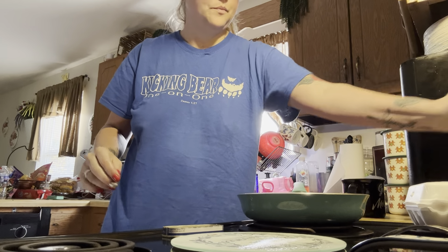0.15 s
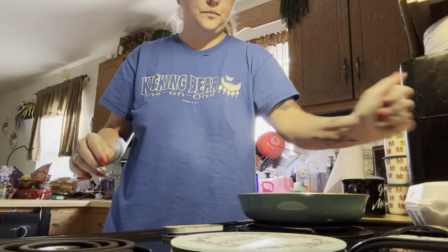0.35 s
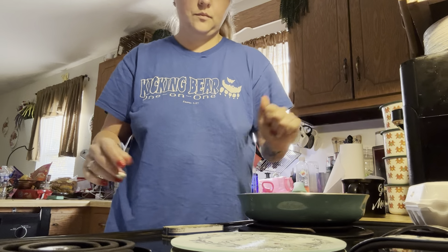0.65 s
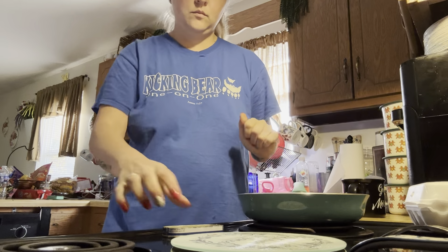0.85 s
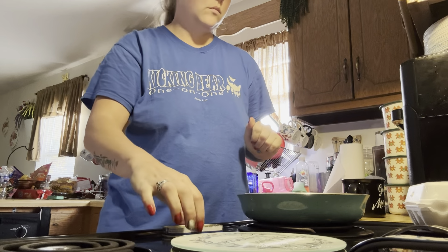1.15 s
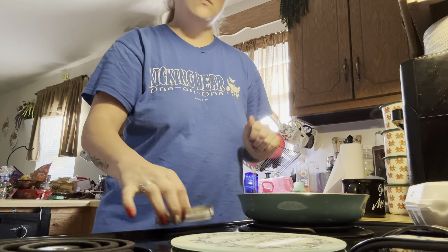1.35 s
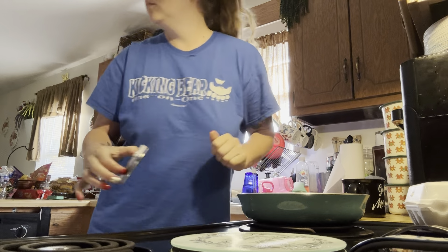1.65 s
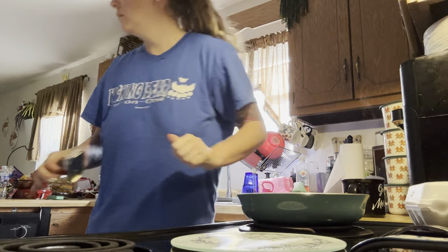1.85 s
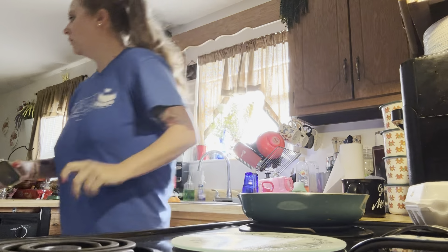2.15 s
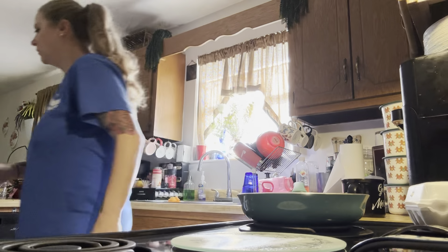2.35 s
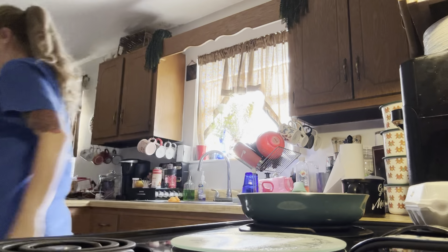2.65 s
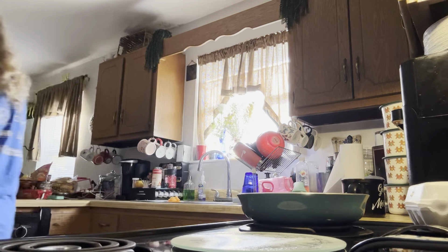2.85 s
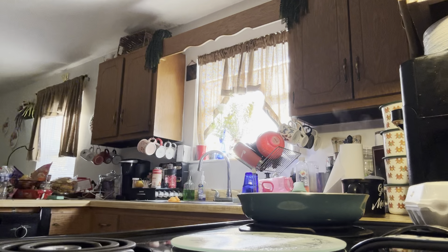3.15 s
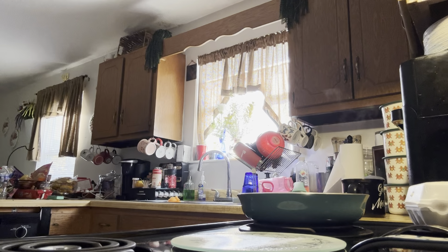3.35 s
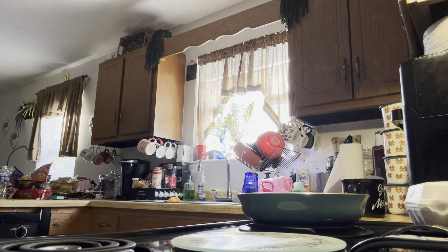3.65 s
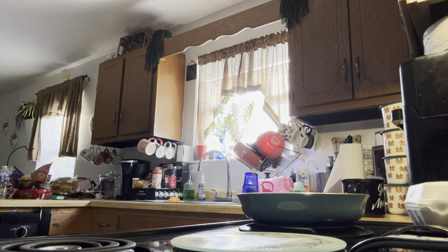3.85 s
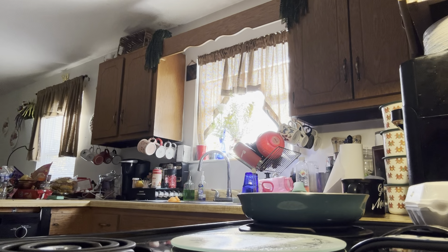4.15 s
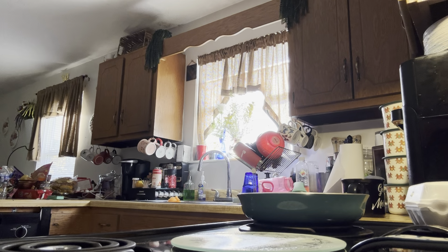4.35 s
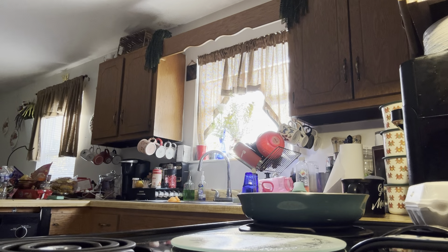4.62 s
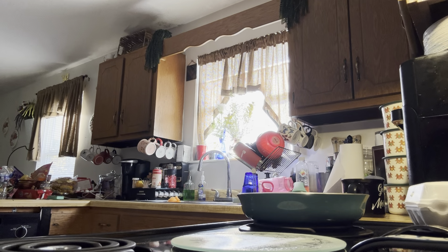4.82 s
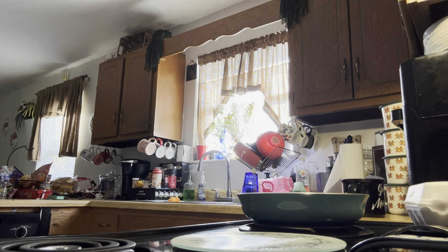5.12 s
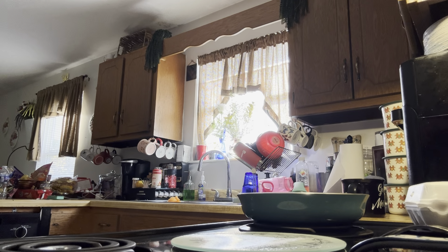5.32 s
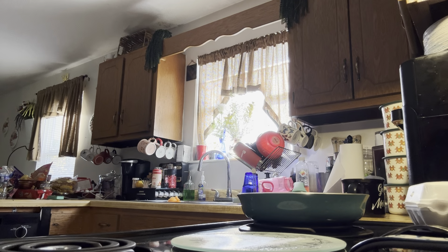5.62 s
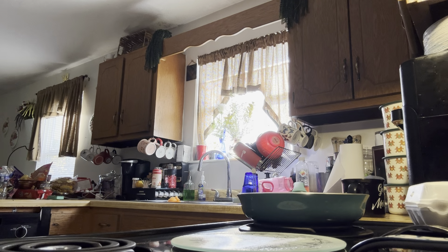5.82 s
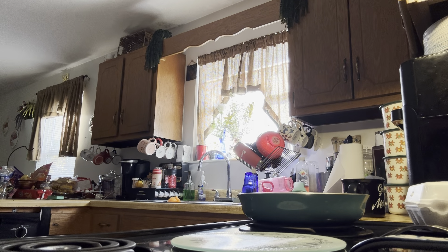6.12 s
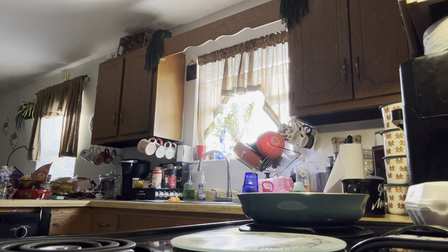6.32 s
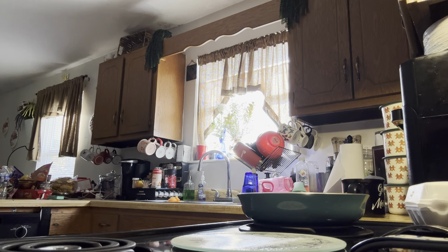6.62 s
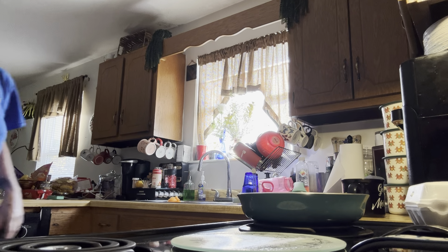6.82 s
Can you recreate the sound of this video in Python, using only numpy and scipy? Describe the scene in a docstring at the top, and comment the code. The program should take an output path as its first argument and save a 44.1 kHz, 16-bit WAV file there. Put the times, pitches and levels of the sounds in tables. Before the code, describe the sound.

A sharp lid snap right beside the microphone, soft shuffling steps over a wooden floor, then distant cupboard knocks, a rattling slam and a drawer starting to roll.

```python
"""Jar lid and steps in a quiet kitchen

A home kitchen heard by a phone on the stove. Close by, a jar lid is slid and snapped up: rough noise and short modes.
Slippered steps cross a wooden floor as brushing noise and low beating thuds. Further away cabinet doors knock broad
wooden resonances, tinware rattles as many thin modes and a drawer starts to roll, over still air and a low rumble.
"""
import sys
import numpy as np
from scipy import signal
from scipy.fft import rfft, irfft, next_fast_len
from scipy.io import wavfile
from scipy.ndimage import uniform_filter1d

SR = 44100
rng = np.random.default_rng(int(sys.argv[2]) if len(sys.argv) > 2 else 0)


def put_to_file(sound):
    """Save the sound as 16-bit audio at rate SR, in the file named by the first command-line argument."""
    columns = np.atleast_2d(sound).T  # one column per channel
    safe = np.clip(columns, -1, 1)
    whole_steps = np.round(safe * 32767)
    wavfile.write(sys.argv[1], SR, whole_steps.astype(np.int16))


N = 307664
T = np.arange(N) / SR  # seconds

WANDER_DB = 1.3  # slow unevenness of blows and rings


def undb(db):
    """Decibels to gain."""
    return np.exp(np.asarray(db) * (np.log(10) / 20))


def level(x, db):
    """Scale to an rms level in dB."""
    return x * undb(db) / np.sqrt(np.mean(x ** 2))


def colour(x, points):
    """Shape the spectrum by (Hz, dB) points joined on a log frequency axis."""
    hz, db = np.transpose(points)
    n = next_fast_len(x.shape[-1])
    f = np.maximum(np.arange(n // 2 + 1) * SR / n, 1)
    gain = undb(np.interp(np.log(f), np.log(hz), db))
    return irfft(rfft(x, n) * gain, n)[..., :x.shape[-1]]


def band(x, lo_hz, hi_hz):
    """Band-pass."""
    return signal.sosfilt(signal.butter(2, [lo_hz, hi_hz], "band", fs=SR, output="sos"), x)


def mode(x, hz, t60):
    """One ringing mode, a two-pole resonator; a unit impulse rings with unit size."""
    r, w = np.exp(-np.log(1000) / (t60 * SR)), 2 * np.pi * hz / SR
    return signal.lfilter([0, r * np.sin(w)], [1, -2 * r * np.cos(w), r * r], x)


def curve(table):
    """A (seconds, dB) curve over time, silent outside it."""
    s, db = np.transpose(table)
    return np.interp(T, s, db, -200, -200)


def swell(s, rise, t60):
    """Envelope that rises smoothly from s on and dies away, top 1."""
    envelope, i = np.zeros(N), int(s * SR)
    t = T[:min(N - i, int(2 * (rise + t60) * SR) + 9)]
    attack = (1 - np.exp(-t / max(rise, 0.0002))) ** 2
    envelope[i:i + len(t)] = attack * np.exp(-np.log(1000) * t / max(t60, 0.004))
    return envelope / envelope.max()


def walk(rate, size=N):
    """Slow chance with about `rate` fresh values a second, smoothed, spread near 1."""
    k = int(SR / rate)
    steps = np.repeat(rng.standard_normal(size // k + 1), k)
    return 1.3 * uniform_filter1d(uniform_filter1d(steps, k), k)[:size]


def grit(spread_db):
    """Mid and side noise with uneven grain sizes in common, rms 1."""
    grain_db = spread_db * np.minimum(rng.exponential(size=N), 4)
    return level(rng.standard_normal((2, N)) * undb(grain_db), 0)


def favour(hz, favoured_hz, lift_db, octaves):
    """Lift in dB of a mode that lies near the pitch a blow favours."""
    return lift_db * np.exp(-(np.log2(hz / favoured_hz) / octaves) ** 2)


def patchy(x, edges_hz):
    """Overlapping bands, each flickering on its own, rms 1."""
    return level(sum(band(x, lo, hi) * undb(1.1 * walk(30)) for lo, hi in zip(edges_hz, edges_hz[2:])), 0)


def background():
    """Still room air and the low rumble of house and fridge, both shaped noise."""
    # Colour of the still air. Each row: frequency in Hz, relative level in dB per Hz.
    air_colour = [(88, -34), (150, -4), (222, -11.5), (361, -6), (431, -10.5), (555, -14), (1870, -27),
                  (2550, -25), (2870, -29.5), (4860, -31), (16000, -36)]
    # Colour of the rumble. Each row: frequency in Hz, relative level in dB per Hz.
    rumble_colour = [(12, -55.5), (20, -26), (43, -10.5), (59, 0), (76, -7.5), (107, 0), (128, -2.5),
                     (150, -15.5), (178, -14), (200, -18.5), (260, -34), (440, -120)]
    # The floor trembling under shifting weight. Each row: time in seconds, level in dB.
    tremble = [(0.0, -63.5), (0.56, -61), (0.85, -66), (1.42, -56), (1.92, -64), (2.23, -58), (3.01, -60),
               (3.3, -56.5), (3.71, -55), (3.95, -61), (4.99, -49), (5.3, -53), (5.7, -52), (6.3, -54),
               (6.98, -51.5)]
    air = level(colour(rng.standard_normal((2, N)), air_colour), -75)
    rumble = level(colour(rng.standard_normal((2, N)), rumble_colour), 0)
    return air * undb(0.74 * walk(4.2)) + rumble * undb(curve(tremble))


def scuffs():
    """Soft brushing in a high and a middle band; each stroke swells and fades."""
    # Soles and cloth brushing. Each row: start in seconds, swell in seconds, fade in seconds,
    # level in dB, middle band in dB relative to that level.
    brushes = [(0.019, 0.015, 0.15, -87, 8.5), (0.39, 0.027, 0.095, -94, 7), (0.6, 0.081, 0.097, -82.5, -5),
               (0.72, 0.028, 0.2, -81.5, -14), (0.87, 0.043, 0.38, -92, 5), (1.92, 0.02, 0.12, -88, 8.5),
               (2.012, 0.022, 0.29, -76, -3.5), (2.23, 0.041, 0.11, -79.5, -25),
               (2.399, 0.035, 0.13, -79.5, -5), (2.49, 0.045, 0.12, -72.5, 5.5),
               (2.668, 0.048, 0.34, -70.5, -0.5), (2.9, 0.053, 0.13, -86, -2.5),
               (3.101, 0.027, 0.082, -78, -9), (3.421, 0.12, 0.22, -71, 3), (3.71, 0.025, 0.096, -73.5, -4),
               (3.955, 0.029, 0.79, -83, -12), (4.24, 0.08, 0.25, -72, -3.5), (4.528, 0.03, 0.41, -76, 2.5),
               (5.822, 0.0097, 0.086, -83, 14), (6.024, 0.014, 0.11, -73, 0),
               (6.109, 0.079, 0.17, -73, -0.5), (6.299, 0.023, 0.11, -79, -8),
               (6.425, 0.013, 0.23, -70.5, -2.5), (6.6, 0.019, 0.27, -76.5, 3),
               (6.85, 0.013, 0.065, -82, -3)]
    # Colour of the high band. Each row: frequency in Hz, relative level in dB per Hz.
    high_colour = [(1760, -23), (3000, -6), (5840, -1), (9620, 1), (12700, -13), (13700, -23), (15000, -18)]
    grain_db = 3.5  # unevenness of the brushing
    hold = 0.7  # under 1 squares the shoulders of swell and fade
    high = patchy(colour(grit(grain_db), high_colour),
                  [1000, 1800, 2800, 4200, 6000, 8300, 11500, 16000, 20000])
    high = high * undb(1.5 * walk(31))
    middle = patchy(grit(grain_db), [604, 890, 1450, 2235, 3130, 4434]) * undb(1.1 * walk(39))
    ramps = [np.interp(T, [s, s + up, s + up + down], [0, 1, 0]) for s, up, down, *_ in brushes]
    stroke = np.sin(np.pi / 2 * np.array(ramps)) ** (2 * hold)
    *_, db, middle_db = np.transpose(brushes)
    return high * (undb(db) @ stroke) + middle * (undb(db + middle_db) @ stroke)


def thuds():
    """Joists and panels take up the weight slowly and beat against each other."""
    # Weight landing on floor and carcass. Each row: start in seconds, joists in dB, panels in dB, t60 in seconds.
    landings = [(2.028, -50.5, -69.5, 0.27), (2.133, -46.5, -52, 0.43), (2.685, -36, -48.5, 0.32),
                (2.748, -42, -52, 0.31), (3.176, -39.5, -42, .15), (3.197, -37, -41, 0.33),
                (3.231, -34.5, -51.5, 0.12), (3.289, -35, -36.5, 0.346), (3.43, -44, -66, 0.15),
                (4.139, -45, -43, 0.4), (4.168, -47, -38, 0.19), (4.268, -53, -45.5, 0.089),
                (4.467, -42, -38.5, 0.33), (4.753, -38, -26, 0.25), (4.837, -39, -32, 0.18),
                (5.071, -41.5, -30.5, 0.18), (5.095, -45, -33.5, 0.2), (5.453, -50.5, -40, 0.27),
                (5.606, -55, -33, 0.27), (5.837, -66, -45.5, 0.13), (6.03, -46.5, -50, 0.13),
                (6.063, -42, -46, 0.408), (6.168, -44.5, -60.5, 0.16), (6.498, -46, -44, 0.23),
                (6.529, -47, -43.5, 0.45), (6.602, -36, -57.5, 0.22), (6.639, -40, -59, 0.21),
                (6.821, -48.5, -35, 0.39), (6.854, -67.5, -29.5, 0.36), (6.937, -42, -28, 0.46)]
    # Low modes of the floor joists. Each row: nominal frequency in Hz, relative level in dB.
    joists = [(28, -9.5), (38, -3), (49, 1.5), (62, 3.5), (74, 5.5)]
    # Modes of the panels. Each row: nominal frequency in Hz, relative level in dB.
    panels = [(104, -5.5), (118, 5.5), (128, 0), (184, -5.5), (235, -14)]
    deep_share = 0.23  # the more a thud goes into the joists, the more it wakes the deepest ones
    out = np.zeros(N)
    chances = rng.standard_normal((len(landings), len(joists + panels), 2))
    for (s, joist_db, panel_db, t60), chance in zip(landings, chances):
        deep_db = deep_share * (joist_db - panel_db)
        tones = [(f, db + joist_db + deep_db * (f < 55)) for f, db in joists]
        tones += [(f, db + panel_db) for f, db in panels]
        now = slice(int(s * SR), int((s + 1) * SR))
        ring = 0
        for (f, db), (detune, turn) in zip(tones, chance):
            angle = 2 * np.pi * f * (1 + 0.036 * detune) * (T[now] - s) + 0.62 * turn
            ring = ring + undb(db - 5.5) * np.sin(angle)
        out[now] += swell(s, 0.012, t60)[now] * ring
    return out


def wood(drive):
    """Broad resonances of doors and boards, each pushed by drive(Hz)."""
    # Wooden resonances. Each row: frequency in Hz, width in Hz, relative level in dB.
    boards = [(201.7, 21.5, 5.5), (255.3, 64, 4.5), (360, 44.3, 6.5), (405, 81, 2.5), (493, 67, 9.5),
              (525, 147, 5.5), (566, 35, 1.5), (729, 84, 3), (781.4, 64, 1.5), (851, 56, 1.5),
              (1025, 190, 1.5), (954, 69, -0.5), (1077, 88, -3.5), (1332, 230, 1), (1473, 72, -1.5),
              (1950, 460, -2.5)]
    return sum((-1) ** k * undb(db - 49.0) * np.sqrt(width) * mode(drive(f), f, 1.98 / width)
               for k, (f, width, db) in enumerate(boards))


def drawer():
    """Rollers bump along their runners and shake the wooden box."""
    # The drawer rolling. Each row: time in seconds, level in dB.
    roll = [(6.79, -69), (6.815, -51), (6.85, -47), (6.93, -47), (6.98, -44.5)]
    out, start = np.zeros((2, N)), int(roll[0][0] * SR) - SR // 2
    bumps = grit(2.7)[:, start:]
    out[:, start:] = level(band(wood(lambda f: bumps), 285, 780), 0)
    return undb(curve(roll) + 1.1 * walk(60)) * out


def tinware():
    """Bursts of small collisions ring thin metal over their own clatter; each burst favours other modes."""
    # Tinware jolted when the door slams, and settling. Each row: start in seconds, level in dB,
    # brightness in dB relative to that level, favoured pitch in Hz, t60 in seconds.
    jostle = [(5.041, -44.5, -5, 4500, 0.28), (5.064, -30, -5.5, 3900, 0.4), (5.096, -32.5, -2, 3370, 0.37),
              (5.13, -33.5, 2, 1480, 0.18), (5.162, -37, -8, 2520, 0.099), (5.185, -43.5, -14, 832, .12),
              (5.198, -41.5, -6, 2520, 0.19), (5.234, -42, -19, 960, 0.13),
              (5.284, -41.5, -4.5, 837, 0.025), (5.291, -33, 0.5, 2840, 0.053),
              (5.299, -34.5, 1, 2450, 0.06), (5.309, -31.5, -15.5, 955, 0.089),
              (5.325, -39.5, -16, 2520, 0.06), (5.35, -49, -3, 880, 0.037), (5.384, -49.5, -4, 940, 0.13)]
    # Modes of the tin. Each row: frequency in Hz, relative level in dB, t60 in seconds.
    tin = [(826, -9, 0.2), (857, -16, 0.056), (960, -3, 0.15), (1020, -17, 0.13), (1250, -11, 0.2),
           (1465, -1.5, 0.1), (1532, -3.5, 0.049), (1684, -12.5, .1), (1775, -4, 0.16), (1863, -8.5, 0.16),
           (1977, -4, 0.07), (2220, -15, 0.037), (2556, -0.5, 0.064), (2830, -12.5, 0.048),
           (2610, -17, 0.05), (2930, -2, 0.043), (3013, -2, 0.057), (3416, -7.5, 0.062), (3680, -12.5, .07),
           (3920, -5, 0.044), (4570, -11.5, 0.076), (4700, -16, .08)]
    # Colour of the clatter. Each row: frequency in Hz, relative level in dB per Hz.
    clatter_colour = [(120, -46), (400, -32.5), (800, -14.5), (2000, -11.5), (4000, -8), (8000, -17.5),
                      (12000, -24), (16000, -42)]
    out, start = np.zeros((2, N)), int(jostle[0][0] * SR)
    now = slice(start, start + SR)
    bumps = (grit(2.3) * undb(0.9 * walk(60)))[:, now]
    push = np.array([swell(s, 0.0046, t60)[now] for s, *_, t60 in jostle])
    _, db, bright_db, favoured_hz, _ = np.transpose(jostle)
    ring = 0
    for f, mode_db, t60 in tin:
        lift_db = favour(f, favoured_hz, lift_db=14, octaves=0.12)
        blows = undb(db + lift_db + (bright_db if f > 2200 else 0)) @ push  # sharp blows wake the upper modes
        uneven = undb(WANDER_DB * walk(30, size=SR))
        ring = ring + undb(mode_db - 37.0) * mode(bumps * blows * uneven, f, t60)
    clatter = colour(bumps * ((undb(db) + undb(db + bright_db)) @ push), clatter_colour)
    out[:, now] = ring + undb(2.0) * clatter
    return out


def clinks():
    """Faint short tones: noise through a narrow resonance, which roughens them."""
    # Faint narrow tones. Each row: start in seconds, frequency in Hz, level in dB, t60 in seconds.
    tones = [(0.038, 2530, -70, 0.3), (0.038, 1140, -71.5, 0.11), (0.415, 2460, -78.5, 0.089),
             (0.41, 4830, -89, 0.12), (0.62, 5350, -83, .15), (0.739, 6330, -72, 0.3),
             (1.53, 2650, -78.5, 0.11), (1.549, 3263, -74, 0.21), (1.58, 5900, -81, 0.19),
             (1.585, 8010, -85, 0.13), (1.69, 1800, -80.5, 0.19), (1.74, 1100, -76, 0.11),
             (1.94, 1420, -75, 0.36), (1.945, 1890, -74.5, 0.31), (2.02, 1370, -77.5, .12),
             (2.08, 2480, -80, 0.17), (2.525, 955, -73, 0.07), (2.54, 2720, -68, 0.15),
             (2.685, 840, -71, 0.069), (2.94, 2150, -74.5, 0.31), (3.918, 1986, -78, 0.13),
             (4.137, 2360, -57, 0.066), (4.165, 2930, -61, 0.13), (4.178, 3620, -60, 0.066),
             (4.19, 3330, -57.5, 0.12), (4.225, 3530, -70, 0.08), (4.28, 1240, -69.5, 1),
             (5.586, 2320, -55.5, .07), (5.6, 2010, -63, .08), (6.296, 1167, -73.5, 0.068)]
    noise = rng.standard_normal((2, N))
    out = np.zeros((2, N))
    for s, f, db, t60 in tones:
        now = slice(int(s * SR), int(s * SR) + SR // 2)
        narrow = level(mode(noise[:, now], f, 0.02), db) * undb(WANDER_DB * walk(40, size=SR // 2))
        out[:, now] += swell(s, 0.0071, t60)[now] * narrow
    return out


def metal_tap():
    """A small metal thing tapped once: a rough burst of noise wakes a few modes."""
    # Modes of the metal. Each row: frequency in Hz, relative level in dB, t60 in seconds.
    tap_ring = [(2055, 1.5, 0.063), (2230, -5, .03), (2640, 3.5, 0.05), (3300, -8.5, .03)]
    contact = rng.standard_normal((2, N)) * swell(5.827, 0.00089, 0.2) / 12
    return sum(undb(db - 63.5) * mode(contact * undb(3.2 * walk(60)), f, t60) for f, db, t60 in tap_ring)


def squeaks():
    """Faint gliding tones, each a sine sweeping between two pitches with unsteady level and phase."""
    # Squeaks. Each row: start in seconds, length in seconds, start pitch in Hz, end pitch in Hz, level in dB.
    glides = [(0.86, 0.12, 4070, 4600, -83), (0.938, 0.17, 5640, 5800, -84.5),
              (1.636, 0.062, 4180, 3760, -81.5), (2.496, .05, 1734, 1500, -69.5)]
    out = np.zeros(N)
    for s, length, hz0, hz1, db in glides:
        u = np.clip((T - s) / length, 0, 1)  # progress through the glide
        angle = 2 * np.pi * length * u * (hz0 + (hz1 - hz0) * u / 2) + 0.8 * walk(200)
        out += undb(db + 3 * walk(99)) * np.sin(np.pi * u) * np.sin(angle)
    return out


def ticks():
    """Small dry ticks: very short bursts of treble noise."""
    # Ticks. Each row: time in seconds, level in dB.
    moments = [(2.7634, -56), (2.8364, -59.5), (2.8904, -61), (2.952, -61.5), (3.0053, -60.5), (3.129, -62),
               (3.351, -55.5), (3.579, -56), (3.768, -60), (5.7127, -55.5), (6.1312, -62), (6.1925, -61.5),
               (6.332, -61.5), (6.386, -61), (6.6728, -62), (6.8577, -62)]
    treble = level(band(rng.standard_normal((2, N)), 6500, 10700), -5)
    return treble * sum(undb(db) * swell(s - 0.001, 0.00066, 0.025) for s, db in moments)


def knocks():
    """Each blow is a bumpy contact that dies away, waking wooden modes with a crack and a fizz on top."""
    # Wooden doors and heels striking. Each row: start in seconds, level in dB, then upper modes, crack and fizz
    # in dB relative to that level, favoured pitch in Hz, t60 in seconds.
    blows = [(2.151, -53, -10, -19, -27.5, 300, 0.12), (2.52, -65, -16, -12, -21, 480, 0.13),
             (2.687, -60.5, -16, -22, -14, 370, 0.48), (3.179, -57, 11.5, 3, 7, 800, 0.12),
             (3.189, -44.5, 2.5, 2, -2.5, 710, 0.36), (3.281, -36.5, -0.5, -10, -26, 520, 0.036),
             (3.294, -40, -5, -12, -32, 357, 0.11), (3.339, -49, -13, -19.5, -22, 510, 0.08),
             (3.828, -62, -6.5, -14.5, -28, 698, 0.24), (4.131, -43, 3, -11, -15, 703, 0.069),
             (4.139, -38.5, 0.5, -15, -24, 780, 0.1), (4.158, -42, 1, -11, -19, 400, 0.1),
             (4.18, -42.5, 1, -14, -20, 520, 0.14), (4.222, -52.5, 0, -14, -17, 620, 0.1),
             (4.26, -55, 0, -18, -16, 620, 0.17), (4.626, -57, 0, -10, -13, 790, 0.56),
             (4.719, -50, 9.5, -13.5, -43, 700, 0.11), (4.729, -38.5, 1, -11, -43, 639, 0.33),
             (4.958, -46, -4.5, -44, -30.5, 698, 0.14), (5.013, -51, -10, -18, -28.5, 500, 0.16),
             (5.069, -29, -7.5, 2.5, 0.5, 360, 0.18), (5.083, -35.5, 7.5, -9, -10.5, 357, 0.052),
             (5.102, -31, -14.5, -20.5, -10, 240, 0.05), (5.115, -34.5, -13, -20, -13.5, 250, 0.05),
             (5.132, -36, -17.5, -20, -18.5, 250, .06), (5.15, -45, 8, -18.5, -16.5, 400, 0.12),
             (5.583, -40.5, 11, -1.5, -32, 965, 0.081), (5.598, -43.5, 5, -5, -26.5, 800, 0.11),
             (5.613, -44.5, 1.5, -4.5, -24, 500, 0.32), (6.055, -52, -4.5, -14.5, -24, 402.4, 0.19),
             (6.303, -60.5, -2, -2.5, -19, 503, 0.1), (6.488, -54.5, -41, -21, -20, 440, 0.54),
             (6.609, -61.5, -9.5, 5, -19, 400, 0.12)]
    bumps = grit(2.8) * undb(WANDER_DB * walk(90))
    push = np.array([swell(s, 0.0043, t60) for s, *_, t60 in blows])
    _, db, upper_db, crack_db, fizz_db, favoured_hz, _ = np.transpose(blows)

    def drive(f):
        """Bumpy force on one wooden mode, stronger near each blow's favoured pitch."""
        lift_db = favour(f, favoured_hz, lift_db=7.5, octaves=0.17)
        force = undb(db + (upper_db if f > 600 else 0) + lift_db) @ push
        return bumps * undb(WANDER_DB * walk(18)) * force

    body = band(wood(drive), 130, 9000)
    crack = level(band(bumps, 1300, 5520), -10) * (undb(db + crack_db) @ push)
    fizz = level(band(grit(2.4), 7100, 10800), -9.5) * (undb(db + fizz_db) @ push)
    return body + crack + fizz


def lid():
    """The lid catches on the glass top in fits of rough noise and ringing, then snaps free."""
    # The lid catching on its way to the snap. Each row: start in seconds, level in dB,
    # treble in dB relative to that level, t60 in seconds.
    slide = [(1.082, -62.5, -15.5, .05), (1.095, -47.5, -8, 0.072), (1.114, -53, -5, 0.12),
             (1.142, -50.5, -16.5, 0.1), (1.164, -52, 2, 0.1), (1.182, -51.5, -4, 0.083),
             (1.203, -45.5, -8.5, 0.12), (1.222, -47, -8, 0.14)]
    # Colour of the snap. Each row: frequency in Hz, relative level in dB per Hz.
    snap_colour = [(150, -49.5), (250, -13.5), (421, -8.5), (988, -5), (1280, -8.5), (1470, -6),
                   (1790, -17.5), (1950, -1.5), (2320, -5.5), (3980, -7), (10500, -9.5), (12800, -16),
                   (16000, -41)]
    # Modes of the lid. Each row: frequency in Hz, relative level in dB, t60 in seconds.
    lid_ring = [(2155, 0.5, 0.048), (2513, -5.5, .025), (3970, 0, 0.02), (1107, -4, 0.026),
                (1918, 0.5, 0.018)]
    # Low tones of the stove top after the snap. Each row: frequency in Hz, level in dB relative to
    # the snap, t60 in seconds.
    stove_tones = [(260, -29, .25), (323, -25.5, 0.47), (425, -17.5, 0.045), (660, -24, 0.044)]
    snap_s, snap_db, snap_t60_s = 1.2418, -21, 0.073

    catch = np.array([swell(s, 0.0027, t60) for s, *_, t60 in slide])
    _, db, treble_db, _ = np.transpose(slide)
    grate = grit(2.9) * undb(WANDER_DB * walk(90))
    sing = sum(undb(ring_db) * mode(grate * undb(WANDER_DB * walk(34)), f, t60) for f, ring_db, t60 in lid_ring)
    rough = level(band(grate, 250, 2100), -0.85) + level(band(grate, 1900, 2300), -15.0) + level(sing, -13.5)
    fine = level(band(grit(2.9), 5000, 16000), 0) * undb(WANDER_DB * walk(69))
    sliding = (undb(db) @ catch) * rough + (undb(db + treble_db) @ catch) * fine

    hit = grit(2.2) * swell(snap_s, 0.00018, snap_t60_s)
    ring = sum(undb(ring_db - 25.5) * mode(hit, f, t60) for f, ring_db, t60 in lid_ring)
    noise = level(colour(rng.standard_normal((2, N)), snap_colour), 0)
    burst = band(noise * swell(snap_s, 0.00049, snap_t60_s), 480, 14000)
    # the glass top shivers on
    shiver = band(noise, 300, 11000) * undb(-13.5 + WANDER_DB * walk(74)) * swell(snap_s, 0.0037, 0.23)
    tick = level(band(grate, 9000, 17500), -12) * swell(snap_s, 0.0002, 0.02)
    stove = sum(undb(tone_db) * level(mode(grate, f, 0.092), 0) * swell(snap_s, 0.0072, t60)
                for f, tone_db, t60 in stove_tones)
    return sliding + undb(snap_db) * (burst + shiver + ring + tick + stove)


def room(x, build_s, scale):
    """Diffuse kitchen echo: noise that builds up and decays band by band, about unit energy in each."""
    # Echo decay. Each row: band centre in Hz, t60 in seconds before scaling.
    decay = [(150, 1), (500, 0.68), (1500, 0.49), (4000, 0.51), (9000, 0.4)]
    t, tail = T[:SR], 0
    edges = [40] + [np.sqrt(a[0] * b[0]) for a, b in zip(decay, decay[1:])] + [18000]
    for (_, t60), lo, hi in zip(decay, edges, edges[1:]):
        shape = (1 - np.exp(-t / build_s)) * np.exp(-np.log(1000) * t / (t60 * scale))
        tail = tail + band(rng.standard_normal((2, SR)), lo, hi) * shape / np.sqrt(np.sum(shape ** 2))
    return signal.fftconvolve(x[None], tail, axes=1)[:, :N]


def waver(x):
    """The echo's delay drifts slightly and slowly, which blurs held tones."""
    at = np.arange(N) + 0.00012 * SR * walk(25)  # drift in seconds, turned to samples
    return np.array([np.interp(at, np.arange(N), channel) for channel in x])


def wide(mid, side):
    """Left and right of two microphone ports: the left leads in phase, the rest is unrelated; bass is common."""
    # The mid sound a quarter cycle early. Each row: frequency in Hz, side minus mid in dB.
    early_share = [(40, -21.5), (110, -16.5), (250, -2), (600, -5), (2000, -6), (5000, -6.5), (8000, -7),
                   (10500, -25.5), (12500, 6.5)]
    # The unrelated sound. Each row: frequency in Hz, side minus mid in dB.
    side_share = [(40, -23.5), (110, -12.5), (250, -7.5), (600, 1), (2000, -2), (5000, -0.5), (8000, -2),
                  (10500, -18), (12500, 6)]
    early = -signal.hilbert(mid, next_fast_len(N)).imag[:N]
    return mid + (colour(early, early_share) + colour(side, side_share)) * np.array([[1], [-1]])


def scene():
    """Near lid, far cabinets, floor and air, as mid and side, then spread to left and right."""
    far = drawer() + tinware() + clinks() + metal_tap() + squeaks() + ticks() + knocks()
    near = lid()
    near_echo = undb(-14.5) * room(near[0], build_s=0.0035, scale=0.81)
    far_echo = undb(-8.5) * room(far[0], build_s=0.011, scale=0.93)
    mid, side = near + far + waver(near_echo + far_echo) + scuffs() + background()
    return wide(mid + thuds(), side)


def record(dry):
    """The two ports differ in the bass; the treble falls off above 12 kHz and ends at 16.9 kHz."""
    # Lean of the bass. Each row: frequency in Hz, left minus right in dB.
    lean = [(30, -1), (60, 0.5), (125, -3.5), (250, -2.5), (500, -0.5)]
    # Treble roll-off. Each row: frequency in Hz, gain in dB.
    treble_fall = [(12300, -0.5), (13400, -7), (15900, -11.5)]
    hz, db = np.transpose(lean)
    leaning = np.array([colour(dry[0], np.c_[hz, db / 2]), colour(dry[1], np.c_[hz, -db / 2])])
    cut = signal.ellip(8, 0.2, 70, 16900, fs=SR, output="sos")
    return signal.sosfilt(cut, colour(leaning, treble_fall))


dry = scene()
out = record(dry)
put_to_file(out)
```